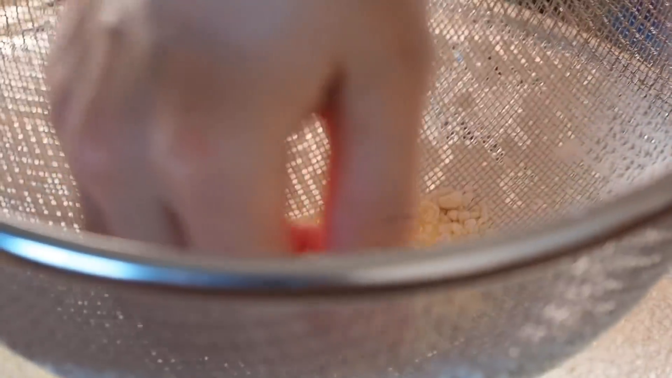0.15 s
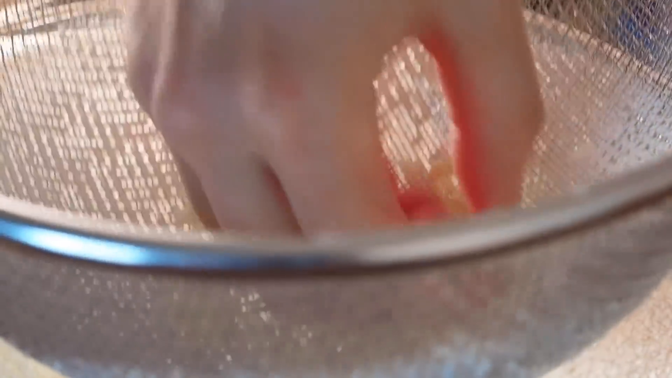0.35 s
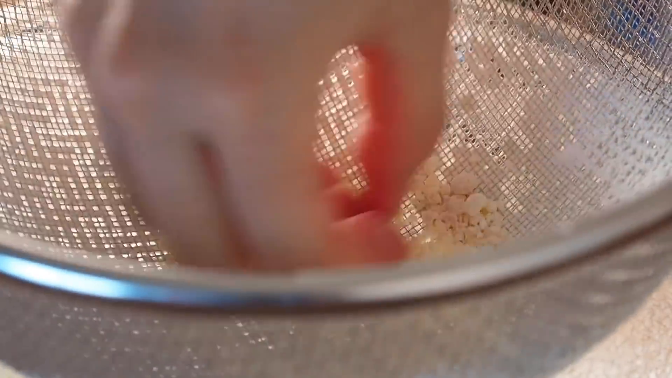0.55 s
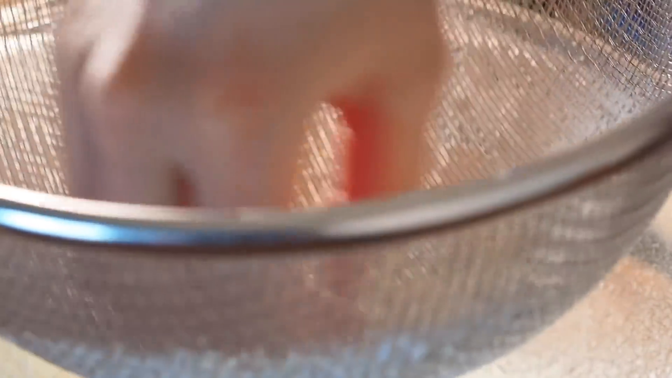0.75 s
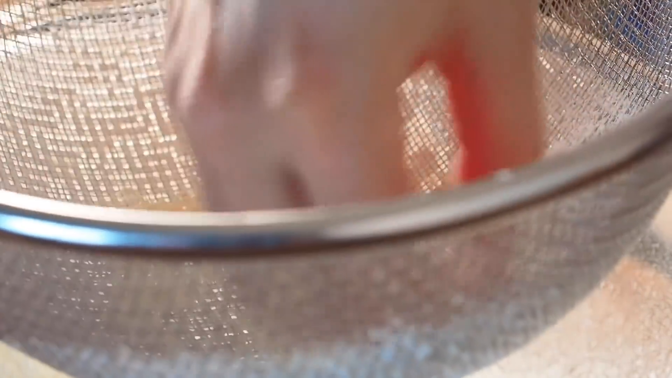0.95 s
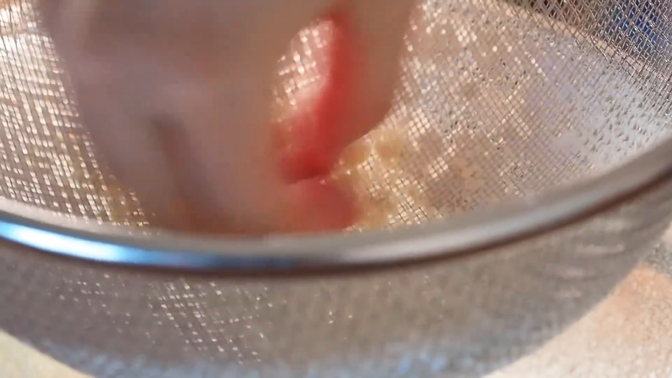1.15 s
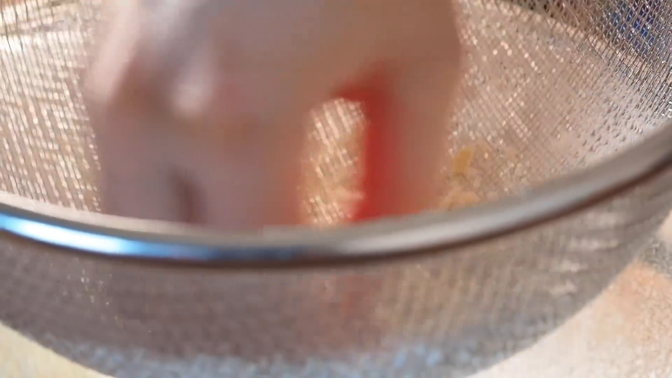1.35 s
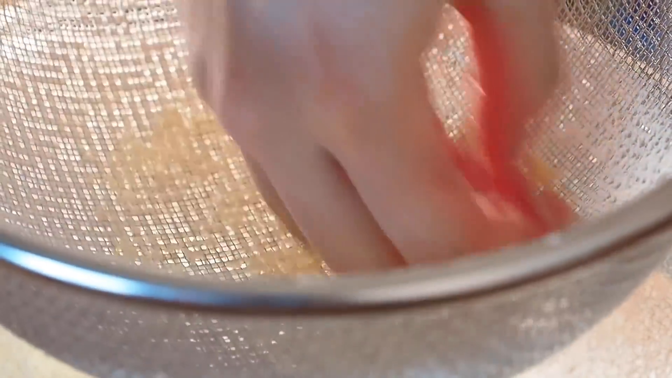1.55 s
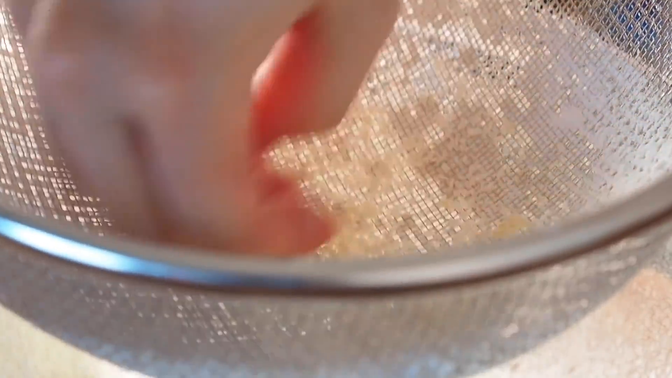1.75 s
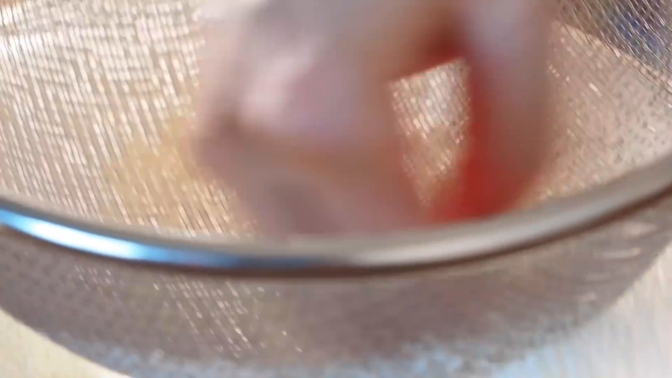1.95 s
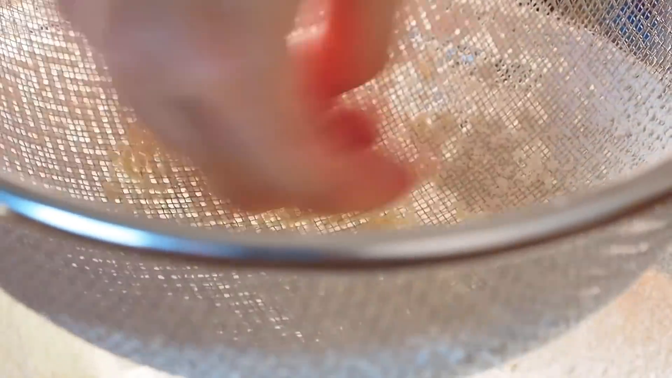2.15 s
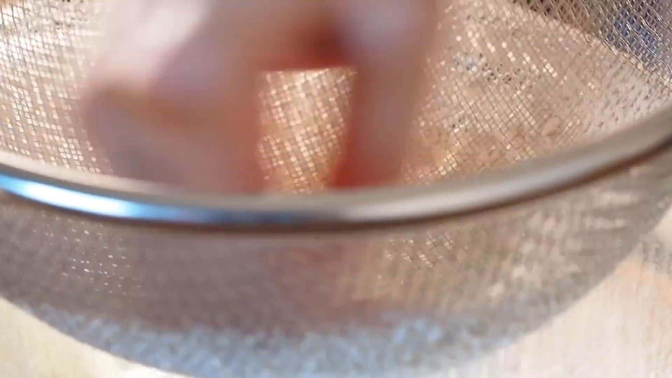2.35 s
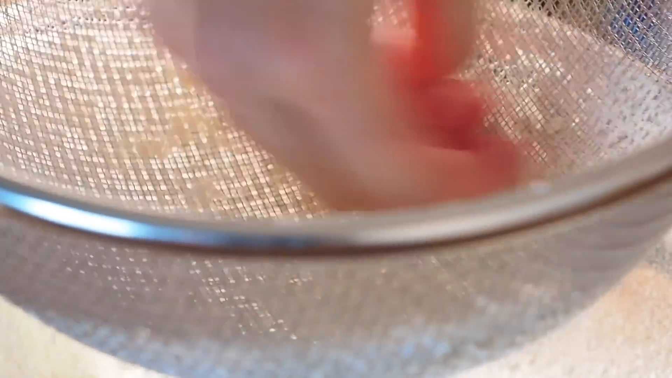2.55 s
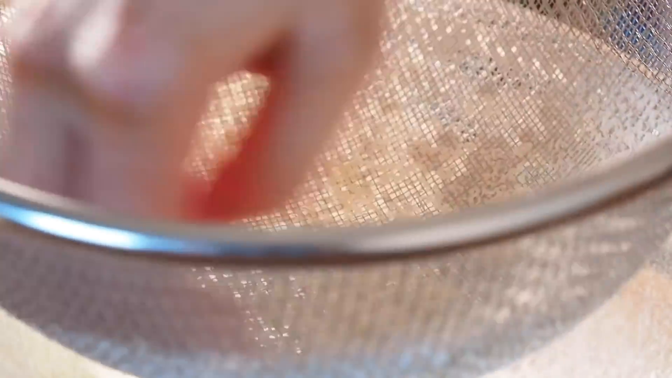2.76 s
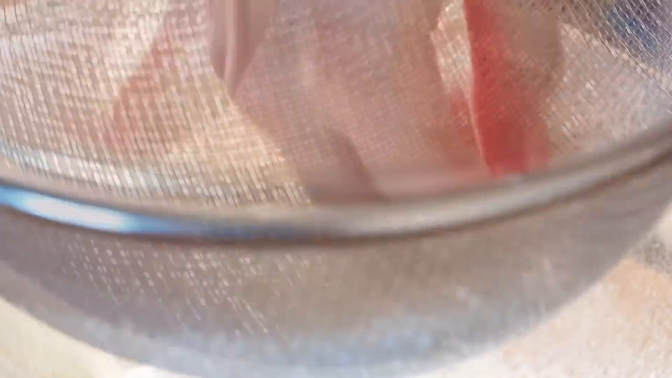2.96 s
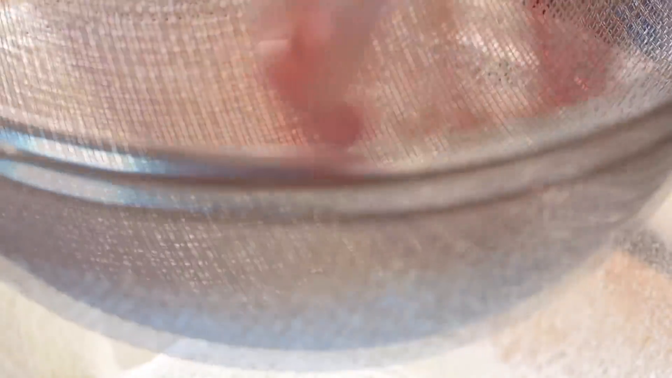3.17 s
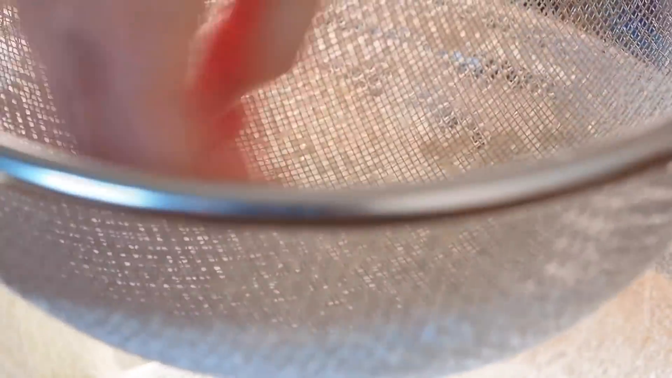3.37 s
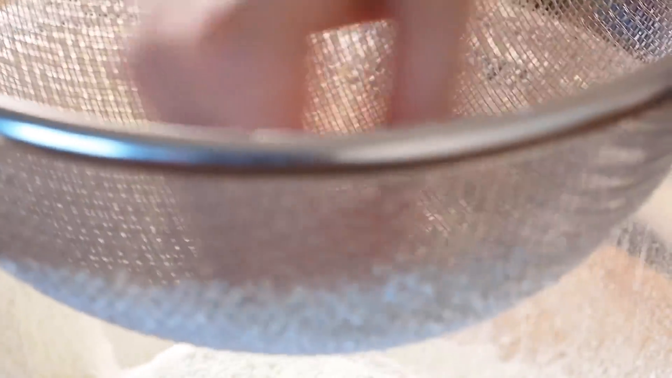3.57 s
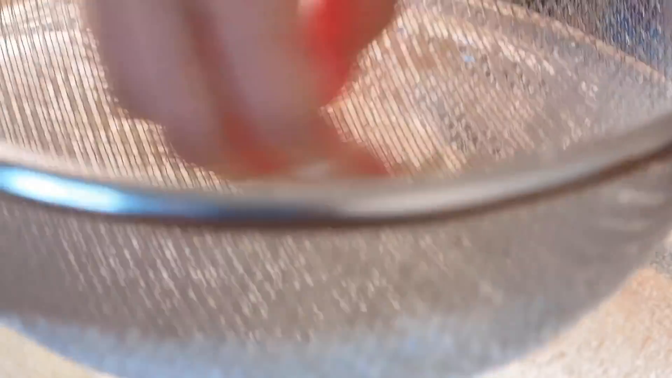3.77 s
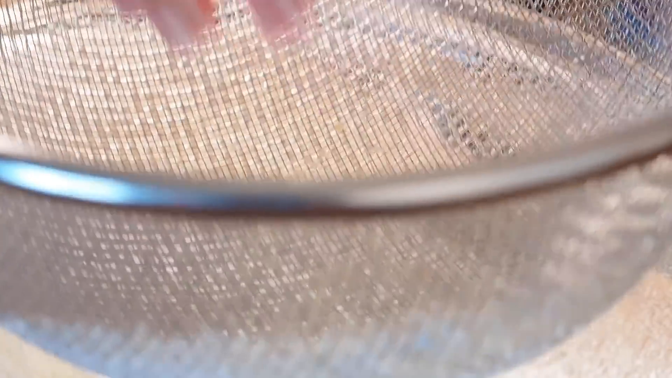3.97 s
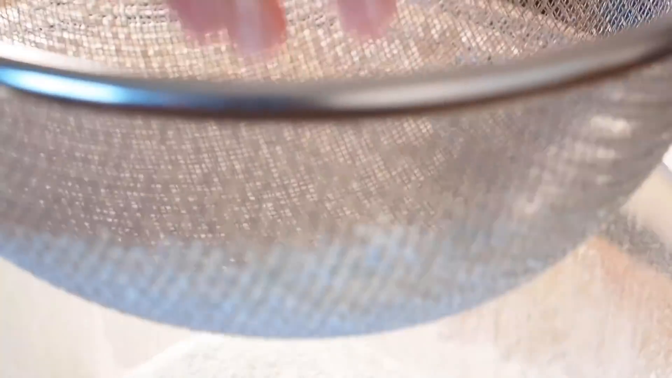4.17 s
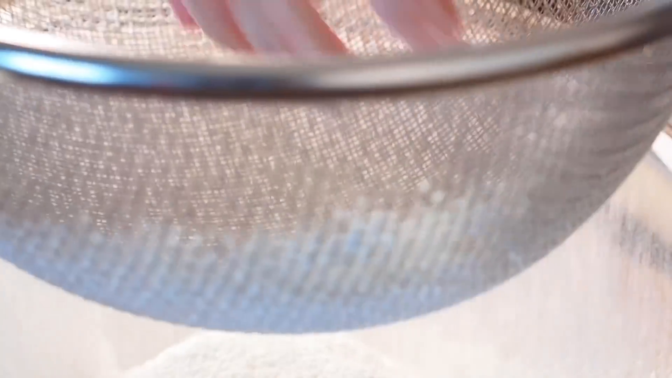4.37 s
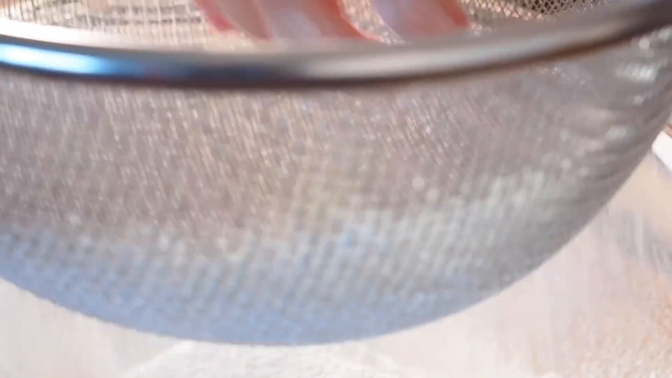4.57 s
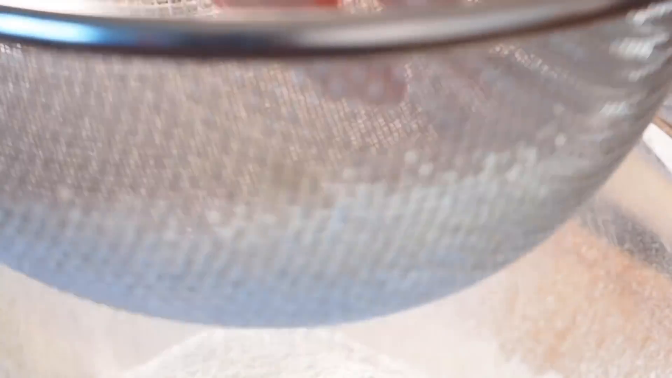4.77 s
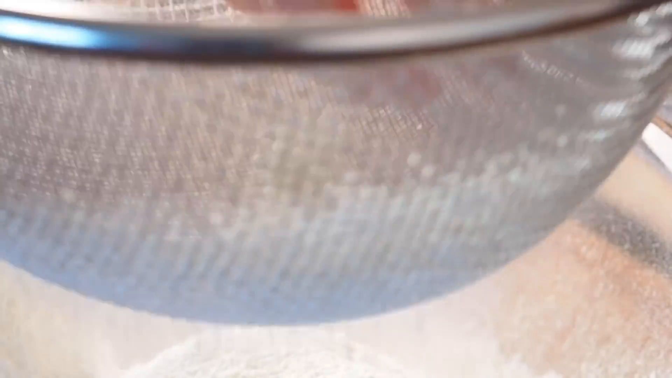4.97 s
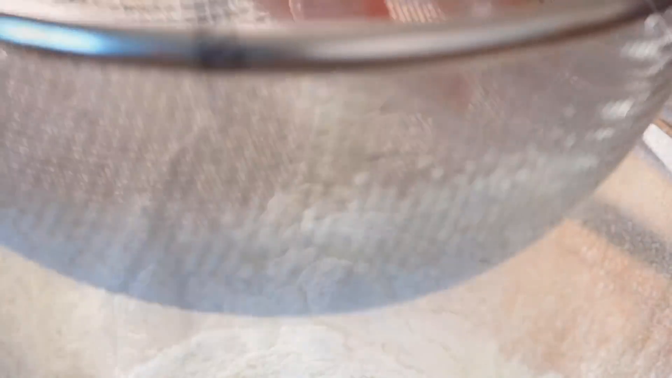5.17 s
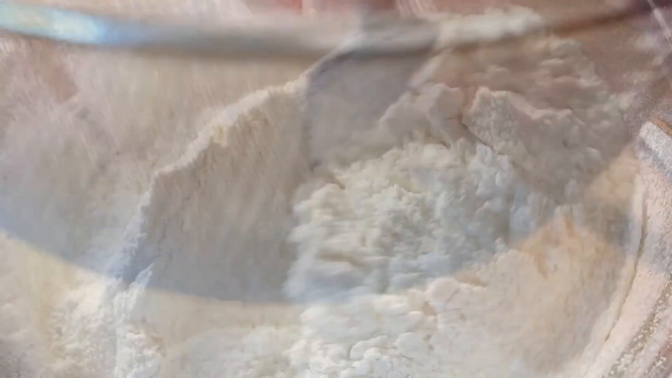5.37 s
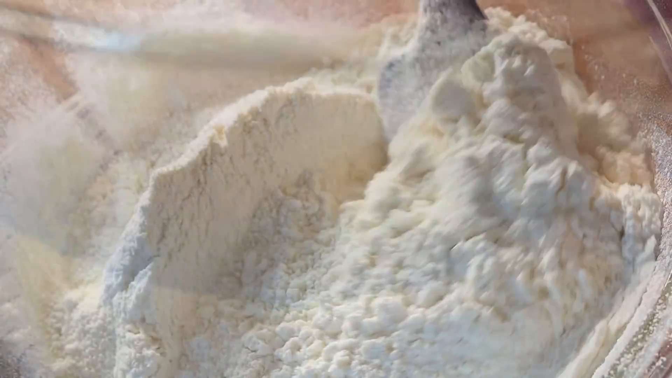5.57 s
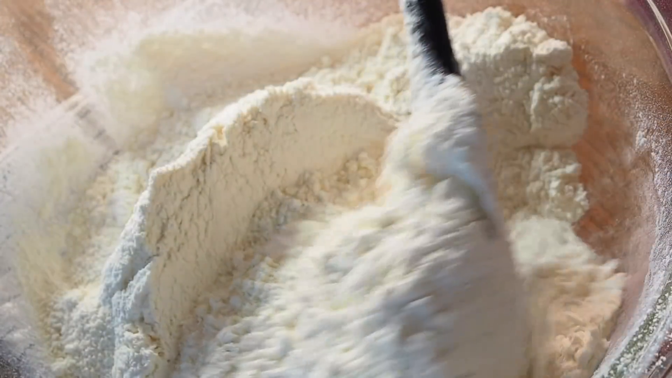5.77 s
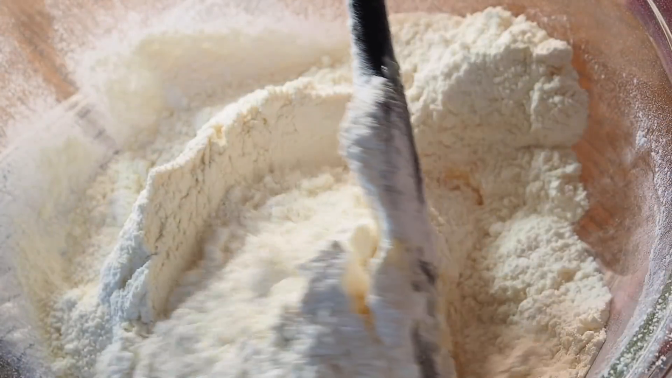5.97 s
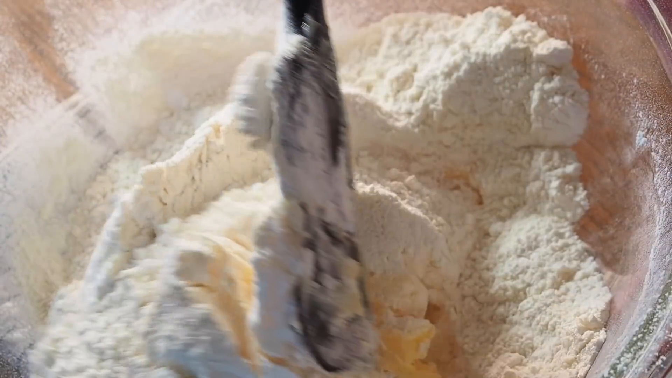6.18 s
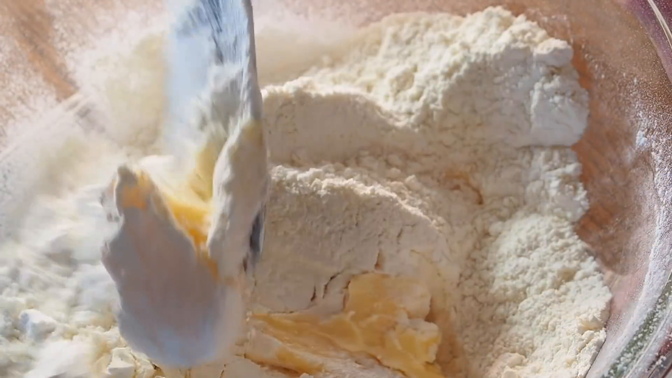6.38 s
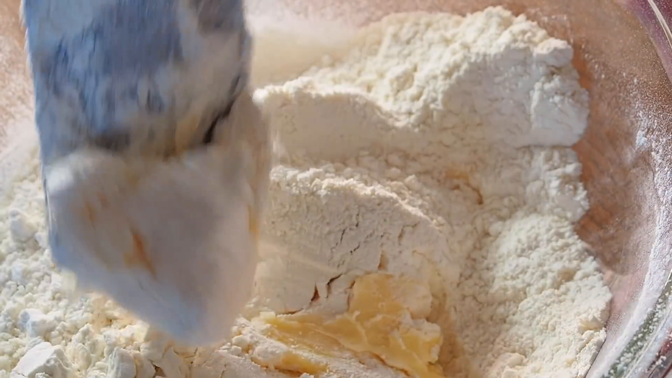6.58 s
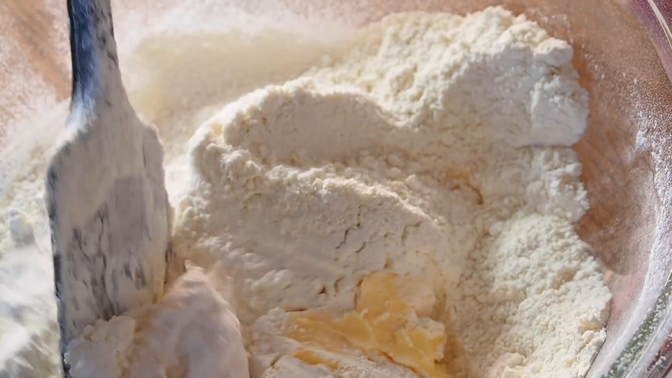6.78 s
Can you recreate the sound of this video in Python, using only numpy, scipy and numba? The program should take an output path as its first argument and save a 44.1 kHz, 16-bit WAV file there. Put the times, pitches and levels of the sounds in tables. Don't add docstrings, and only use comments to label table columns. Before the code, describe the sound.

Fingertips rub grit across a fine wire sieve in quick buzzing, scraping strokes, then a hand taps the rim steadily, thumping and rattling powder loose.

```python
import sys
import numpy as np
from scipy import signal
from scipy.fft import rfft, irfft, next_fast_len
from scipy.io import wavfile
from scipy.ndimage import uniform_filter1d
from numba import njit

SR = 44100
rng = np.random.default_rng(int(sys.argv[2]) if len(sys.argv) > 2 else 0)


def file_out(sig):
    cols = np.atleast_2d(sig).T
    lim = np.clip(cols, -1, 1)
    pcm = np.round(lim * 32767).astype(np.int16)
    wavfile.write(sys.argv[1], SR, pcm)


def how_loud(loudness_db):
    steps = np.asarray(loudness_db, float) / 20
    return 10 ** steps


N = 301187
PAD = next_fast_len(N + 4096, True)
T = np.arange(N) / SR
F = np.fft.rfftfreq(PAD, 1 / SR) + 1

# start_s, length_s, pressure_db, skin_grip_db, wires_crossed_hz
PUSHES = [
    (0.627, 0.057, -45, 2.5, 329.4),
    (0.897, 0.1, -45, 3, 640),
    (1.21, 0.12, -42, 0, 680),
    (1.551, 0.071, -42, 2.5, 520),
    (1.852, 0.05, -41, -2, 850),
    (2.198, 0.11, -44, 4, 1000),
    (2.588, 0.089, -43, 2, 740),
    (2.918, 0.089, -44.5, 0, 800),
    (3.434, 0.095, -45.5, 4, 920),
]
# start_s, length_s, pressure_db, skin_grip_db, wires_crossed_hz
DRAGS = [(0.088, 0.035, -67, 21, 284), (0.1, 0.039, -54, 12.5, 289.5), (0.596, 0.025, -53.5, 12.5, 331.7),
         (1.0, 0.053, -53, -3, 350), (1.3, 0.092, -51, -14, 342.7), (1.64, 0.066, -52, -8, 294),
         (1.765, .04, -62, 13, 322.7), (1.93, 0.12, -51, -14, 430), (2.065, .055, -53.5, 0.5, 379.4),
         (2.33, 0.097, -58.5, -10, 388), (2.44, 0.036, -60.5, 4, 395), (2.71, 0.098, -55.5, -11, 382.4),
         (2.785, 0.089, -48.5, -21, 322.5), (3.02, 0.0602, -55, -2, 297.7), (3.09, 0.083, -49.5, 2, 560),
         (3.18, 0.064, -51, 1, 660), (3.245, 0.14, -48.5, 9, 218.8), (3.54, 0.048, -47, 3.5, 400),
         (3.585, 0.039, -47, -15, 540), (3.67, 0.06, -57.5, -1, 640), (3.748, 0.029, -49, 12, 333),
         (3.764, 0.044, -42, 0.5, 677)]


def level(x):
    return x / np.sqrt(np.mean(x ** 2))


def on_log(table):
    hz, value = np.array(table).T
    return np.interp(np.log(F), np.log(hz), value)


@njit
def svf(x, hz, width):
    y, b, l = np.empty(len(x)), 0., 0.
    for i in range(len(x)):
        g, k = np.tan(np.pi * hz[i] / SR), width[i] / hz[i]
        v = (b + g * (x[i] - l)) / (1 + g * (g + k))
        b, l, y[i] = 2 * v - b, l + 2 * g * v, k * v
    return y


def band(x, hz, width):
    return svf(x, np.full(len(x), 1. * hz), np.full(len(x), 1. * width))


def walk(rate):
    hold = int(SR / rate)
    steps = np.repeat(rng.standard_normal(N // hold + 1), hold)
    return 0.78 * uniform_filter1d(uniform_filter1d(steps, hold), hold)[:N]


def ports(envelope, colour, lo_hz, hi_hz, like=0.95):
    # pitch_hz, likeness (0-1)
    likeness = [(20, 0.1), (300, 0.5), (700, 0.93), (3000, 1), (5000, 0.75), (7500, .52), (16000, 0.25)]
    # pitch_hz, lead_radians
    lead = [(1500, 0.093), (4500, 0), (7500, 0.99), (10500, 0.84), (14000, .5)]
    gain = how_loud(on_log(colour))
    inside = (F > lo_hz) & (F < hi_hz)
    gain = gain / np.sqrt(np.sum(gain[inside] ** 2) / len(F))
    both, left, right = rfft(envelope * rng.standard_normal((3, N)), PAD) * gain
    alike = np.clip(like * on_log(likeness), 0, 1)
    turn = np.exp(.5j * on_log(lead))
    pair = np.sqrt(alike) * both * np.array([turn, 1 / turn])
    pair = pair + np.sqrt(1 - alike) * np.array([left, right])
    return irfft(pair, PAD)[:, :N]


def grains(per_s, spread_db, tail_ms):
    hit = (rng.random(N) < per_s / SR) * how_loud(spread_db * rng.exponential(size=N))
    return level(signal.lfilter([1], [1, -np.exp(-1000 / (tail_ms * SR))], hit))


def swell(rows, onset_db, swell_s, sag_db_s, release_db_s):
    landing_db_s = 2502
    power = np.full(N, 1e-14)
    for (s, length, db), sag in zip(rows, np.broadcast_to(sag_db_s, len(rows))):
        u = T - s
        fall = onset_db * np.clip(1 - u / swell_s, 0, 1) + landing_db_s * np.maximum(-u, 0)
        fall = fall + sag * np.clip(u - swell_s, 0, max(length - swell_s, 0))
        fall = fall + release_db_s * np.maximum(u - length, 0)
        on = (fall < 70).nonzero()[0]
        power[on] += how_loud(2 * (db - fall[on]))
    return np.sqrt(power)


def kitchen():
    # pitch_hz, level_db (per Hz)
    room = [(16, -27.5), (28, 1.5), (65, -6), (80, -24), (154, -4), (209, -23), (331, -21), (357, -19.5),
            (386, -25.5), (537, -27), (692, -29), (1730, -40), (12300, -48.5), (16000, -81), (22000, -120)]
    hum_hz = 148
    air = how_loud(-79) * ports(how_loud(1.5 * walk(5)), room, 200, 12000, like=.5)
    hum = level(band(band(rng.standard_normal(N), hum_hz, 26.0), hum_hz, 44.0))
    return air * how_loud(np.array([[-1.5], [1.5]])) + how_loud(-82) * hum * how_loud(np.array([[-1.], [1.]]))


def handling():
    # start_s, length_s, level_db, knock_db (against the wobble)
    jolts = [(0, 0.016, -30, -12), (0.218, .02, -45, -28), (0.598, .04, -34, -0.5), (0.873, .03, -47, -21),
             (1.07, 0.051, -53, 10.5), (1.52, .04, -53, -22), (2.068, .06, -51.5, 1),
             (2.545, .04, -62, -14), (2.82, .04, -59.5, 12), (3.1, .04, -45.5, -9.5),
             (3.255, .08, -42.5, 7.5), (3.68, .05, -49, 12.5), (3.796, .04, -41.5, -4),
             (4.05, .04, -55, -12.5), (5.067, .04, -42, -21), (5.16, .03, -52, 0), (5.496, .04, -38, -29),
             (5.59, .03, -45, -10), (6.807, .03, -51, -4.5)]
    follows = dict(onset_db=11, swell_s=.02, sag_db_s=110, release_db_s=600)
    fidget = how_loud(-65 + 1.0 * walk(11)) * (T < 4.3)
    low = fidget + swell([(s, n, db) for s, n, db, _ in jolts], **follows)
    high = how_loud(7.5) * fidget + swell([(s, n, db + knock) for s, n, db, knock in jolts], **follows)
    smooth = int(.012 * SR)
    low = uniform_filter1d(low, smooth)
    high = how_loud(-8.0) * uniform_filter1d(high, smooth)
    out, shared = [], rng.standard_normal((3, N))
    for _ in range(2):
        a, b, c = shared + 0.7 * rng.standard_normal((3, N))
        wobble = level(band(band(a, 43.0, 21.0), 32., 24.0))
        knock = level(band(band(b, 80.0, 140.0), 150.0, 170.0)) * how_loud(1.0 * walk(20))
        sway = level(band(band(c, 6.7, 6.4), 7.4, 6.3)) * np.interp(T, [0, 5.7, 5.95], [1, 1, .02])
        out.append(low * wobble + high * knock + how_loud(-46) * sway)
    return np.array(out)


def motion():
    slowed, slowing_s, slowest_hz = .05, .1, 240
    ring_hz, dip_hz, back_s = 3200, 1250, .09
    hz, patch_hz = np.full(N, DRAGS[0][4] * 1.), np.full(N, ring_hz * 1.)
    for row in sorted(PUSHES + DRAGS):
        start_s, speed_hz, push = row[0], row[4], row in PUSHES
        on = T >= start_s
        u = T[on] - start_s
        slowing = 1 - push * (1 - slowed) * (1 - np.exp(-u / slowing_s))
        hz[on] = np.maximum(speed_hz * slowing, min(slowest_hz, speed_hz))
        if push:
            patch_hz[on] = ring_hz - dip_hz * np.exp(-(u / back_s) ** 2)
    return uniform_filter1d(hz, size=600), patch_hz


def finger(lag_s):
    hz = np.interp(T - lag_s, T, motion()[0])
    return hz, np.cumsum(hz * (1 + 0.12 * walk(90))) / SR


def loose(t, axis):
    # start_s, push_yield_db, extra_drag_yield_db, fall_between_strokes_db
    loosened = np.array([(0, -3, -1, -70.5), (.2, -1.5, 0, -66), (.55, -7, -3, -63.5), (1.1, -1, 0.5, -58),
                         (1.7, -2.5, 6, -58.5), (2.1, 3, 5.5, -53), (2.35, 1.5, 13.5, -55.5),
                         (2.8, 4, 0.5, -49.5), (3.4, 8.5, -0.5, -47.5), (3.82, 3, -3.5, -52.5)])
    return np.interp(t, loosened[:, 0], loosened[:, axis])


def contact(follows, rest_db, grip=0, powder=0):
    rows = [(s, n, db + grip * g + powder * loose(s, axis=1)) for s, n, db, g, _ in PUSHES]
    for s, n, db, g, _ in DRAGS:
        rows.append((s, n, db + grip * g + powder * (loose(s, axis=1) + loose(s, axis=2))))
    lift_s, lift_db_s = 3.838, 487
    lifted = how_loud(-lift_db_s * np.maximum(T - lift_s, 0))
    return np.hypot(swell(rows, *follows), how_loud(loose(T, axis=3) + rest_db)) * lifted


def wires(hz, phase):
    follows = (15, 0.037, 60, 400)
    rest_db = -9.5
    second = finger(-0.02)[1]
    buzz = how_loud(4.5 * walk(32)) * (np.sin(2 * np.pi * phase) + .22 * np.sin(4 * np.pi * phase))
    buzz = level(buzz + 0.71 * how_loud(7.0 * walk(35)) * np.sin(2 * np.pi * second))
    buzz = contact(follows, rest_db, grip=1) * buzz * how_loud(np.array([[-1.], [1.]]))
    skin = rng.standard_normal(N) + .5 * rng.standard_normal((2, N))
    rough = np.array([level(svf(svf(ch, hz * 0.81, hz * 1.8), hz * 1.1, hz * 1.1)) for ch in skin])
    rough = rough * contact(follows, rest_db, grip=.5) * how_loud(3 * walk(30))
    return .75 * buzz + .62 * rough


def scrape(hz, phase):
    # pitch_hz, level_db (per Hz)
    grit = [(470, -26), (800, -15.5), (1100, 3), (1400, -18), (2800, -13.5), (5410, -19), (8330, -16.5),
            (15300, -30.5), (15900, -37.5), (16500, -57)]
    # pitch_hz, width_hz, level_db
    bowl = [(660, 93, 12), (1138, 30, -9), (1627, 150, 4.5), (2970, 150, -9)]
    follows = (4.56, 0.024, 58, 400)
    catch = 1.324 + np.exp(-(phase % 1) / 0.36)
    drag = catch * contact(follows, -14) * how_loud(3.2 * walk(35))
    raw = ports(drag * grains(2000., 2.2, 1.), grit, 900, 5700)
    clumps = np.zeros((2, N))
    for f in (800, 1400, 2300, 3600, 5200):
        clumps += how_loud(5.5 * walk(24)) * np.array([band(ch, f, f * .5) for ch in raw])
    ring = sum(how_loud(db + 5.0) * np.array([band(ch, f, w) for ch in raw]) for f, w, db in bowl)
    patch_hz = np.clip(motion()[1] * (1 + 0.13 * walk(25)), 900, 6000)
    patch = np.array([svf(ch, patch_hz, 0.3 * patch_hz) for ch in raw]) * how_loud(4.5 * walk(12))
    patch += 0.42 * np.array([svf(ch, 2.6 * hz, 0.3 * hz) for ch in raw])
    mixed = 0.084 * raw + 0.5 * clumps + ring + 1.11 * patch
    return how_loud(-8.5) * mixed * how_loud(np.array([[-.6], [.6]]))


def sift():
    # pitch_hz, level_db (per Hz)
    powder = [(1200, -44.5), (2200, -13.5), (3200, -14), (4300, -11), (5500, -15), (6800, -3), (8200, -1),
              (10700, -7.5), (15100, -13.5), (16100, -32.5), (16500, -46.5)]
    # pitch_hz, level_db (per Hz)
    fines = [(2500, -28.5), (4800, -20.5), (6100, -2.5), (7800, 2), (9600, -2.5), (10800, -13.5),
             (15300, -29.5), (16500, -43.5)]
    # start_s, length_s, level_db, thinning_db_per_s
    trickle = np.array([(4.097, .008, -64, 32), (4.125, 0.098, -58.5, 153.5), (4.36, .11, -61, 70),
                        (4.598, 0.11, -61, 75), (4.816, 0.11, -60, 140.5), (5.016, 0.12, -54, 112.5),
                        (5.235, 0.12, -63.5, 22), (5.38, .008, -59.5, 24), (5.454, 0.15, -58.5, 91),
                        (5.547, 0.0064, -65, 20), (5.656, 0.11, -53.5, 138), (5.796, .008, -66, 27.5),
                        (5.88, .015, -93, 200)])
    follows = (2, .03, 81, 240)
    flow = grains(12000.0, 1.2, 0.31) * how_loud(2.3 * walk(24.675))
    rubbed = ports(flow * contact(follows, 0, powder=1), powder, 6000, 11000)
    mottle = np.zeros((2, N))
    for hz in (7200, 8600, 11600):
        mottle += how_loud(6.4 * walk(30)) * np.array([band(ch, hz, hz * 0.32) for ch in rubbed])
    falling = swell(trickle[:, :3], onset_db=1, swell_s=.004, sag_db_s=trickle[:, 3], release_db_s=417.5)
    shaken = how_loud(-1.45) * ports(flow * falling, fines, 6000, 10500)
    return (how_loud(-1.5) * (rubbed + 0.21 * mottle) + shaken) * how_loud(np.array([[.8], [-.8]]))


def taps():
    # start_s, rattle_db, thump_db, bounce_db, push_width_ms
    hits = [
        (4.1073, -17.5, -21.5, -10.5, 6.5),
        (4.3414, -14.5, -24, 2.5, 4.5),
        (4.5728, -18.5, -23, -1, 4.2),
        (4.7929, -16, -23.5, -2, 2.1),
        (5.0037, -13.5, -26, 1.5, 2.95),
        (5.215, -18, -27.5, 3, 4.4),
        (5.4282, -16, -28, 1.5, 3.0),
        (5.6432, -17.5, -28.5, -1, 3.2),
        (5.8615, -30, -44, 0, 3.7),
    ]
    # pitch_hz, level_db (per Hz)
    rattling = [(200, -27.5), (400, -4), (700, -10.5), (1300, -22.5), (2600, -16.5), (3400, -20.5),
                (4400, -15.5), (6100, -12.5), (7840, 0), (10600, -13), (15400, -18.5), (16400, -44.5)]
    # pitch_hz, level_db (per Hz)
    settling = [(200, -23), (400, 0), (700, 3.5), (1500, -8), (3500, -9), (6000, -13), (12000, -25)]
    out, shake, trail = np.zeros((2, N)), np.zeros(N), np.zeros(N)
    lead_in = 200
    u = T[:SR // 5] - lead_in / SR
    after = np.maximum(u, 0)
    for s, rattle_db, thump_db, bounce_db, width_ms in hits:
        first = int(s * SR) - lead_in
        at = slice(first, first + len(u))
        v = u - (1.7 + .35 * width_ms) / 1000
        push = np.exp(-(v / width_ms * 1000) ** 2) * (1 - np.exp(-after / .001))
        late = np.exp(-((v - .0028) / width_ms * 560) ** 2) * (1 - np.exp(-after / 0.00057))
        w = np.maximum(v, 0)
        bounce = np.cos(2 * np.pi * 106. * w) * np.exp(-(w / 0.0082) ** 1.1) * np.where(v < 0, push, 1)
        suck = -np.exp(-((v - .021) / 0.016) ** 2)
        ripple = np.cos(2 * np.pi * 227.0 * v) * np.exp(-np.abs(v) / 0.0079) * (1 - np.exp(-after / 0.0017))
        left = 0.45 * late + 0.28 * how_loud(bounce_db) * bounce + .25 * ripple + 0.3 * suck
        right = .35 * push + .88 * how_loud(bounce_db) * bounce + .11 * suck
        out[:, at] += how_loud(thump_db + 12.0) * np.array([left, right])
        burst = np.exp(-((v + 0.0018) / width_ms * 900) ** 2) * (1 - np.exp(-after / 0.00014))
        again = 0.13 * np.exp(-((v - .0095) / 0.0041) ** 2)
        fading = 0.19 * np.exp(-after / 0.021) * (after > 0)
        shake[at] += how_loud(rattle_db - 9.5) * (burst + again + fading)
        trail[at] += how_loud(rattle_db - 35.5) * np.exp(-after / 0.03) * (after > 0)
    rattle = ports(shake * grains(6000, 2, .6), rattling, 3000, 15000)
    return out + rattle * how_loud(np.array([[1.], [-1.]])) + ports(trail, settling, 400, 3200)


def spatula():
    # start_s, level_db, pitch_hz
    ticks = [
        (6.0079, -70, 7540),
        (6.0322, -82, 7500),
        (6.231, -72.5, 6460),
        (6.2956, -77.5, 6960),
        (6.4561, -67.5, 2920),
        (6.497, -52.5, 3750),
        (6.6097, -80, 3380),
        (6.6641, -71, 8000),
    ]
    out = np.zeros(N)
    swish = level(band(rng.standard_normal(N), 1600.0, 3500.)) * how_loud(2.38 * walk(43))
    out += how_loud(-66.0) * swish * np.exp(-((T - 5.755) / 0.043) ** 2)
    for s, db, hz in ticks:
        snap = rng.standard_normal(400) * np.exp(-T[:400] / 0.00064)
        first = int(s * SR)
        out[first:first + 400] += how_loud(db + 5) * 1.3 * band(band(snap, hz, hz * .9), hz, hz * 1.6)
    brush = level(band(band(rng.standard_normal(N), 4070.0, 2650.0), 4200., 4000.0))
    out += how_loud(-78.0) * brush * np.exp(-((T - 6.522) / 0.021) ** 4)
    return out * how_loud(np.array([[-2.5], [2.5]]))


def scene():
    hz, phase = finger(0)
    return kitchen() + handling() + wires(hz, phase) + scrape(hz, phase) + sift() + taps() + spatula()


def band_limit(x):
    return signal.sosfilt(signal.butter(12, 16800, fs=SR, output="sos"), x)


def record(dry):
    return band_limit(dry)


dry = scene()
out = record(dry)
file_out(out)
```